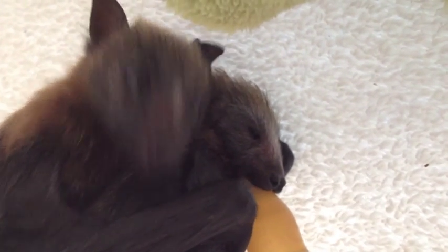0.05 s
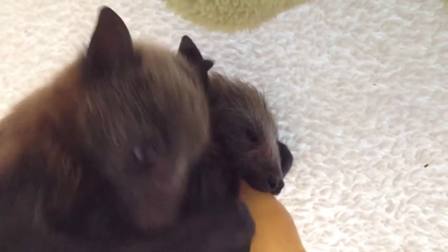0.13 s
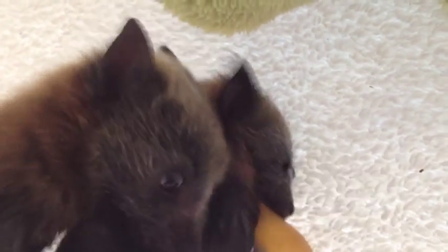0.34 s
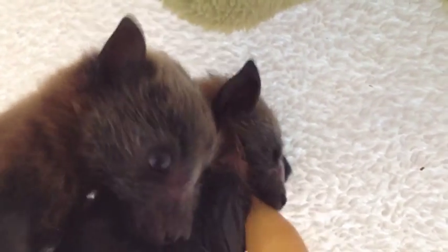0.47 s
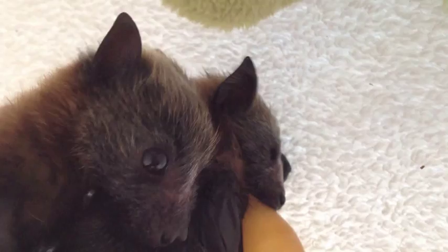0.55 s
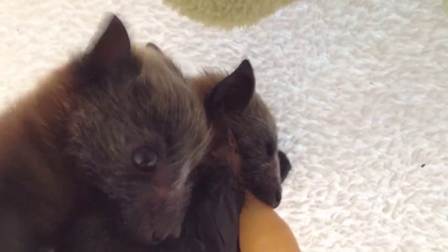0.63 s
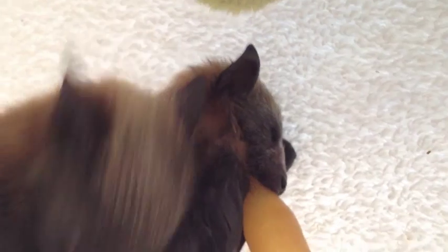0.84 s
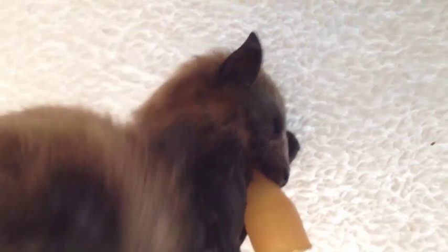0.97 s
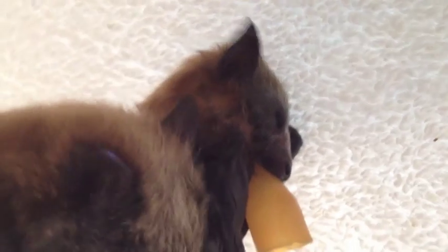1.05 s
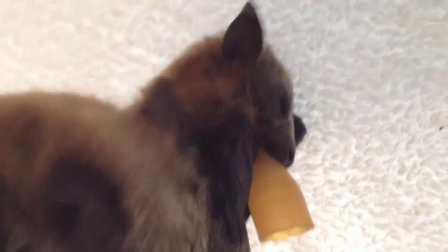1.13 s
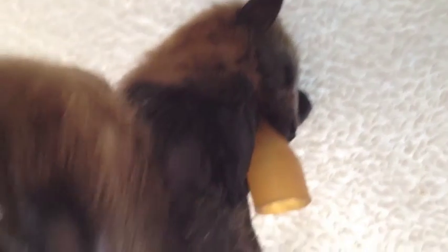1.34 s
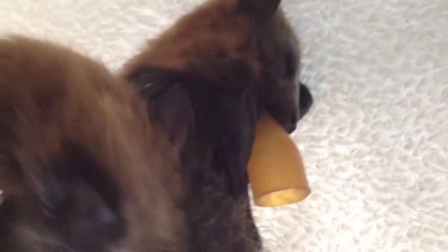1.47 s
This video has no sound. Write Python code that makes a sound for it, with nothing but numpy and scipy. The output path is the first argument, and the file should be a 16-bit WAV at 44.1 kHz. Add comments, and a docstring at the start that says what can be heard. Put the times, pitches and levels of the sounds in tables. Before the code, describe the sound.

Close to a small microphone in a quiet room, a young bat lets out a piercing, scratchy squawk lasting about a tenth of a second, followed by faint mouth clicks, dull taps and light claw ticks on a towel.

```python
"""In a small quiet room, a baby fruit bat squawks once, close to the microphone: a wet mouth click, a harsh
rasp, a thin squeal that breaks into more rasps, and weak closing peeps. Then come a smack, soft taps and
tiny ticks as the bats shift on a towel, over a steady hush. Rasps are pulses ringing a throat; squeal and
peeps are gliding tones; clicks, taps and ticks are short rings and noise bursts; the hush is shaped noise."""
import sys
import numpy as np
from scipy import signal
from scipy.fft import rfft, irfft
from scipy.io import wavfile
from scipy.ndimage import uniform_filter1d

SR = 44100
rng = np.random.default_rng(int(sys.argv[2]) if len(sys.argv) > 2 else 0)


def to_wav(s):
    """Save 16-bit WAV."""
    ch = np.atleast_2d(s).T  # columns
    pcm = np.round(np.clip(ch, -1, 1) * 32767)  # PCM
    wavfile.write(sys.argv[1], SR, pcm.astype(np.int16))


N = 66150
T = np.arange(N) / SR  # time of every sample, s

# Colour of the room hush: pitch_hz, level_db (relative)
HUSH_COLOUR = [(25, -9), (60, -15), (92, -8.5), (140, 1.5), (256, -3.5), (317, 2), (373, -6.5), (677, -7.5),
               (818, -9.5), (1190, -11.5), (1740, -17.5), (2280, -19.5), (4500, -24), (8600, -28),
               (14800, -24.5), (16000, -36.5)]
HUSH_DB = -65
# Colour of the room's reflections: pitch_hz, level_db (relative)
ROOM_COLOUR = [(100, -1), (500, 4), (1500, 2), (4500, -2), (7500, 1.5), (10500, -4.5), (13000, -4.5),
               (16000, -15)]
# Early and late room reflections: build_up_s, t60_s (time to fall 60 dB), level_db
EARLY, LATE = (0.0033, .06, -14), (.015, 0.29, -27.5)
LOW_CUT_HZ, TOP_HZ = 120, 15400  # limits of the microphone and recorder

# Ticks of claws and fur: start_s, level_db, decay_s, dull_share (0-1)
TICKS = [(0.9669, -52, 0.00042, 0), (0.9897, -56.5, .0006, 0.13), (1.0024, -52, 0.00062, 0.04),
         (1.0955, -54, 0.0044, 0.81), (1.354, -54.5, 0.0012, .5), (1.3582, -49, 0.0024, 0.78),
         (1.3717, -59, 0.025, 0.24), (1.4188, -44.5, .0012, 0.33), (1.4245, -45.5, 0.0023, 0.68)]
# Colours of a bright and a dull tick: pitch_hz, level_db (relative)
BRIGHT_TICK = [(300, -14.5), (1500, 2), (4500, 12), (8000, 5.5), (13000, 10.5), (16000, -23)]
DULL_TICK = [(300, -20), (1200, 11), (2400, 8), (4000, -6), (8000, -35), (16000, -20)]

# Soft taps: start_s, level_db, thump_delay_s, thump_db
TAPS = [(0.7108, -45, 0.0045, -58.5), (0.9712, -44.5, .012, -51), (1.1771, -41, 0.0214, -53.5)]
# Rings inside each tap: pitch_hz, ring_s, level_db (relative to the tap), lag_s
TAP_RINGS = [(1593, 0.00075, -9.5, 0.0013), (1144, 0.0017, -8.5, 0.0022), (820, 0.00053, -3.5, 0.0062),
             (527, 0.0026, -7, 0.0031), (443.4, 0.0019, -7, 0), (246.5, 0.0028, -7.5, 0.0033)]
THUMP_HZ, THUMP_RING_S = 155.6, .0062

# Wet mouth clicks: start_s, level_db, cavity_hz, ring_s, crack_db (relative), dull_share (0-1)
CLICKS = [(0.1973, -40, 2130, 0.00039, 4.5, 0.06), (0.2003, -36, 2086, 0.00042, 8, 0.1),
          (0.199, -39.5, 1686, 0.00082, 7, 0.27), (0.1992, -45.5, 1700, 0.00046, -4, 0.4),
          (0.2033, -40.5, 1250, 0.00043, 11.5, 0.4), (.2077, -73, 1050, 0.00051, -3, 0),
          (.2117, -38, 3403, .0003, -24, .3), (.3308, -27.5, 3890, 0.00029, 1, .8),
          (0.3301, -48, 752, 0.00092, 1, 0.9), (0.3607, -48, 610, 0.0009, 7, 0.9),
          (.7080, -43, 1826, .0004, 0, 0.01), (0.7085, -40, 1350, .0008, -8, 0.96),
          (0.7106, -33.5, 2670, 0.00023, 0, 0.62), (.7132, -37, 980, 0.00041, -2, 0.37),
          (.7125, -48.5, 240, 0.006, -22, 0.71), (.7290, -43, 2530, 0.00035, 7, 0.65)]
# Colours of a bright and a dull crack: pitch_hz, level_db (relative)
BRIGHT_CRACK = [(300, -14), (1000, -7), (2500, -4), (4500, -1.5), (7500, -6), (10500, 2), (13000, -3.5),
                (16000, -14.5)]
DULL_CRACK = [(300, -14), (900, -6.5), (2800, 3), (4500, -3.5), (7000, -17), (16000, -26.5)]
CRACK_DECAY_S = .0006
CRACK_TAIL_DECAY_S, CRACK_TAIL_DB = .0035, -14

# Weak peeps: start_s, length_s, start_hz, end_hz, level_db (at the start)
PEEPS = [(0.233, 0.0056, 4366, 4410, -28.5), (.2354, 0.0031, 4108, 3100, -22.5),
         (.2913, 0.0051, 4500, 3660, -23.5), (.2962, 0.011, 3245, 3050, -37.5),
         (0.3206, 0.011, 3412, 3300, -35)]
PEEP_ATTACK_S, PEEP_RELEASE_S = 0.00095, .001
PEEP_FADE_DB, PEEP_OVERTONE_DB = -7, -27.5  # level change by the end; overtone against the main tone
PEEP_WOBBLE, PEEP_FLUTTER = .035, .3  # random spread of pitch and of strength, as fractions

# Path of the squeal: time_s, pitch_hz, first_harmonic_db, second_harmonic_db, third_harmonic_db
SQUEAL = [(.2664, 4215, -52.5, -67.5, -72.5), (.2671, 4036, -37, -53.5, -71.5),
          (.2694, 3710, -35, -60.5, -66.5), (.2704, 4204, -28.5, -49.5, -48),
          (.2715, 4593, -13.5, -32.5, -39), (.2725, 5000, -22.5, -11.5, -20),
          (.2738, 5015, -23, -14.5, -15.5), (.2752, 5030, -37, -34.5, -34.5),
          (.2765, 4993, -31.5, -24.5, -32), (.2795, 4930, -43.5, -43, -52.5)]
SQUEAL_WOBBLE, SQUEAL_FLUTTER = 0.0086, 0.17  # random spread of pitch and of strength, as fractions

# Rasps: start_s, length_s, pulses_per_s, level_db, upper_hz, upper_width_hz, noise_amount,
# lower_start_hz, lower_end_hz (upper and lower are throat resonances)
RASPS = [(0.2229, 0.0097, 700, -5.5, 10620, 1353, .16, 4700, 3990),
         (0.2792, 0.0026, 1050, -9.5, 11740, 946, .15, 4300, 3774),
         (0.2862, .0038, 1000, -8.5, 10940, 928, .15, 4513, 4158),
         (0.23, .0042, 930, -20.5, 11000, 2000, .5, 4000, 3300),
         (0.294, 0.011, 540, -25.5, 11660, 1213, .7, 4570, 3500),
         (0.3, .0090, 750, -25.5, 11200, 1700, .7, 3700, 3270)]
# Other throat resonances: pitch_hz, width_hz, level_db (against the upper one)
THROAT = [(800, 800, -33), (2600, 1500, -34), (5400, 500, -17), (6500, 900, -20), (8800, 700, -18),
          (12050, 650, -17), (14900, 450, -23)]
LOWER_WIDTH_HZ, LOWER_DB = 550, -13  # lower resonance, level against the upper one
PULSE_JITTER, PULSE_SCATTER_DB = 0.033, 2.9  # spread of timing (in pulse periods) and of level
PUFF_CYCLES = .3  # decay time of a noise puff, in pulse periods
THROAT_JITTER = 0.031  # spread of the resonances from pulse to pulse, as a fraction
THROAT_ROUNDNESS = 3  # higher gives a rounder swell
RASP_SWELL = 0.59  # below 1 a rasp holds its strength longer


def amp(db):
    """Turn decibels into a gain."""
    return 10 ** (np.asarray(db) / 20)


def unit(x):
    """Scale a sound to an average strength (rms) of 1."""
    return x / np.sqrt(np.mean(x ** 2))


def noise(colour):
    """Make noise of rms 1 whose spectrum follows a colour table."""
    hz, db = np.array(colour, float).T
    freq = np.maximum(np.arange(N // 2 + 1) * SR / N, 1)
    gain = amp(np.interp(np.log(freq), np.log(hz), db))
    return unit(irfft(rfft(rng.standard_normal(N)) * gain, N))


def wobble():
    """Fast random unsteadiness with spread 1."""
    return unit(uniform_filter1d(rng.standard_normal(N), size=40))


def ring(start, hz, ring_s, t=T, order=1):
    """A resonance whose swing grows until ring_s and dies away; a higher order rounds the swell."""
    age = np.maximum(t - start, 0)
    rise = np.minimum(age / ring_s, 60)
    envelope = (rise * np.exp(1 - rise)) ** order
    return envelope * np.sin(2 * np.pi * hz * age)


def fade(start, decay_s):
    """A sudden start followed by an exponential decay."""
    return (T >= start) * np.exp(-np.clip((T - start) / decay_s, 0, 100))


def hush():
    """The steady hush of the room, made from shaped noise."""
    return amp(HUSH_DB) * noise(HUSH_COLOUR)


def room(x):
    """Add quick reflections from nearby things and a faint longer tail, both made of fading noise."""
    response = np.zeros(N)
    for build_s, t60, db in (EARLY, LATE):
        decay = np.exp(-np.log(1000) * T / t60)
        tail = noise(ROOM_COLOUR) * np.minimum(T / build_s, 1) ** 2 * decay
        response += amp(db) * unit(tail) / np.sqrt(N)  # total energy set by db
    return x + signal.fftconvolve(x, response)[:N]


def ticks():
    """Claws and fur catch on the towel in decaying noise bursts, some bright, some muffled."""
    bright, dull = noise(BRIGHT_TICK) / 2, noise(DULL_TICK) / 2
    out = np.zeros(N)
    for start, db, decay_s, share in TICKS:
        grain = (1 - share) * bright + share * dull
        out += amp(db) * fade(start, decay_s) * grain
    return out


def taps():
    """Dull padded knocks made of several short rings, with a delayed low thump."""
    out = np.zeros(N)
    for start, db, delay, thump_db in TAPS:
        for hz, ring_s, ring_db, lag in TAP_RINGS:
            out += amp(db) * amp(ring_db) * ring(start + lag, hz, ring_s)
        out += amp(thump_db) * ring(start + delay, THUMP_HZ, THUMP_RING_S)
    return out


def mouth_clicks():
    """Tongue and lips part with a crack of noise and the mouth cavity rings briefly."""
    bright, dull = noise(BRIGHT_CRACK) / 2, noise(DULL_CRACK) / 2
    out = np.zeros(N)
    for start, db, cavity_hz, ring_s, crack_db, share in CLICKS:
        snap = fade(start, CRACK_DECAY_S) + amp(CRACK_TAIL_DB) * fade(start, CRACK_TAIL_DECAY_S)
        crack = snap * ((1 - share) * bright + share * dull)
        out += amp(db) * (ring(start, cavity_hz, ring_s) + amp(crack_db) * crack)
    return out


def peeps():
    """Nearly pure whistles that weaken, and mostly sag in pitch, as the effort runs out."""
    out = np.zeros(N)
    for start, length, from_hz, to_hz, db in PEEPS:
        along = np.clip((T - start) / length, 0, 1)
        pitch = (from_hz + (to_hz - from_hz) * along) * (1 + PEEP_WOBBLE * wobble())
        phase = 2 * np.pi * np.cumsum(pitch) / SR
        attack = np.clip((T - start) / PEEP_ATTACK_S, 0, 1)
        release = np.clip((start + length - T) / PEEP_RELEASE_S, 0, 1)
        level = amp(db + PEEP_FADE_DB * along) * (1 + PEEP_FLUTTER * wobble())
        tone = np.sin(phase) + amp(PEEP_OVERTONE_DB) * np.sin(2 * phase)
        out += attack * release * level * tone
    return out


def squeal():
    """A whistle that leaps up in pitch and turns shrill as its higher harmonics grow; all of them flutter."""
    times, hz, *harmonics = np.array(sorted(SQUEAL)).T
    pitch = np.interp(T, times, hz) * (1 + SQUEAL_WOBBLE * wobble())
    phase = 2 * np.pi * np.cumsum(pitch) / SR
    out = np.zeros(N)
    for number, db in enumerate(harmonics, start=1):
        level = np.interp(T, times, amp(db), 0, 0)  # silent outside the squeal
        out += level * (1 + SQUEAL_FLUTTER * wobble()) * np.sin(number * phase)
    return out


def throat_ring(resonances, stretch, t):
    """One pulse rings every throat resonance at once, with all pitches multiplied by stretch."""
    out = np.zeros(len(t))
    for hz, width, db in resonances:
        ring_s = np.sqrt(THROAT_ROUNDNESS) / (4 * width)  # a wider resonance dies sooner
        out += amp(db) * ring(0, hz * stretch, ring_s, t, order=THROAT_ROUNDNESS)
    return out


def rasps():
    """Trains of uneven vocal pulses, each with a puff of noise, ring a throat whose lower resonance sinks."""
    out, t = np.zeros(N), T[:512]
    for start, length, rate, db, upper_hz, upper_width, noise_amount, from_hz, to_hz in RASPS:
        chance = rng.standard_normal((32, 3))  # room for 32 pulses
        hiss = rng.standard_normal((32, len(t)))
        puff_s = PUFF_CYCLES / rate
        for k, (late, size, shift) in enumerate(chance):
            age = (k + .5 + PULSE_JITTER * late) / rate
            if age >= length:
                continue
            lower_hz = from_hz + (to_hz - from_hz) * np.sqrt(max(age, 0) / length)
            upper = (upper_hz, upper_width, 0)
            lower = (lower_hz, LOWER_WIDTH_HZ, LOWER_DB)
            throat = throat_ring([upper, lower, *THROAT], 1 + THROAT_JITTER * shift, t)
            # the square root keeps the puff's energy the same for any decay time
            puff = noise_amount * hiss[k] * np.exp(-t / puff_s) * np.sqrt(2 / (puff_s * SR))
            breath = np.convolve(puff, throat)[:len(t)]
            swell = abs(np.sin(np.pi * age / length)) ** RASP_SWELL
            push = swell * amp(db + PULSE_SCATTER_DB * size)
            at = int((start + age) * SR)
            out[at:at + len(t)] += push * (throat + breath)
    return out


def scene():
    """The bats echo in the room, over its steady hush."""
    bats = ticks() + taps() + mouth_clicks() + peeps() + squeal() + rasps()
    return (hush() + room(bats))[None]


def record(dry):
    """The small microphone loses the deep bass and the recorder cuts the top."""
    bass_cut = signal.butter(2, LOW_CUT_HZ, "high", fs=SR, output="sos")
    top_cut = signal.ellip(8, .2, 60, TOP_HZ, fs=SR, output="sos")  # steep cut
    return signal.sosfilt(top_cut, signal.sosfilt(bass_cut, dry))


dry = scene()
out = record(dry)
to_wav(out)
```